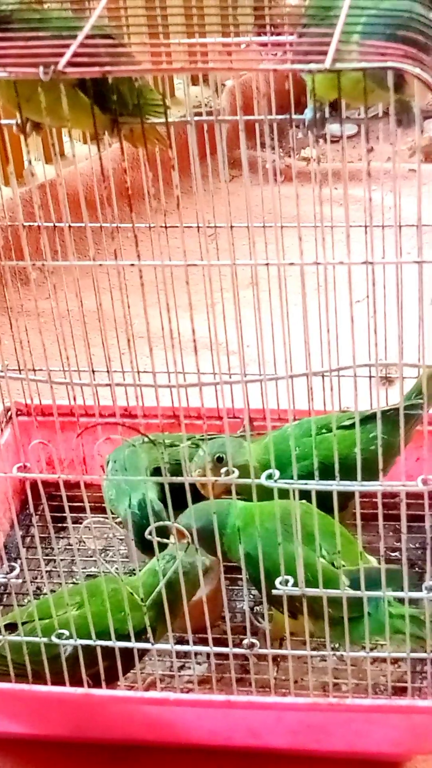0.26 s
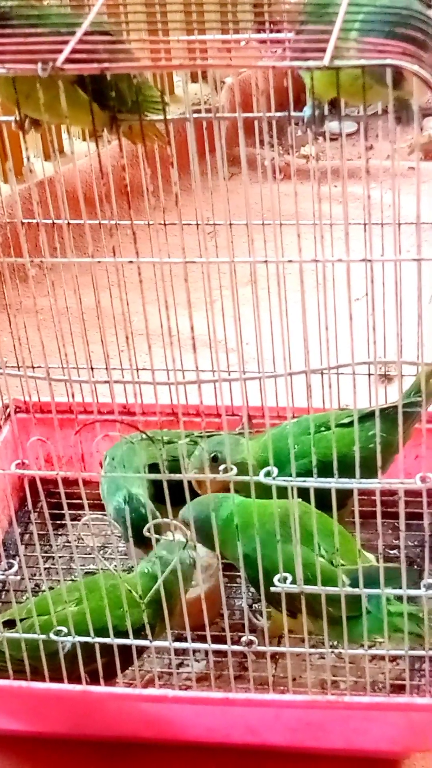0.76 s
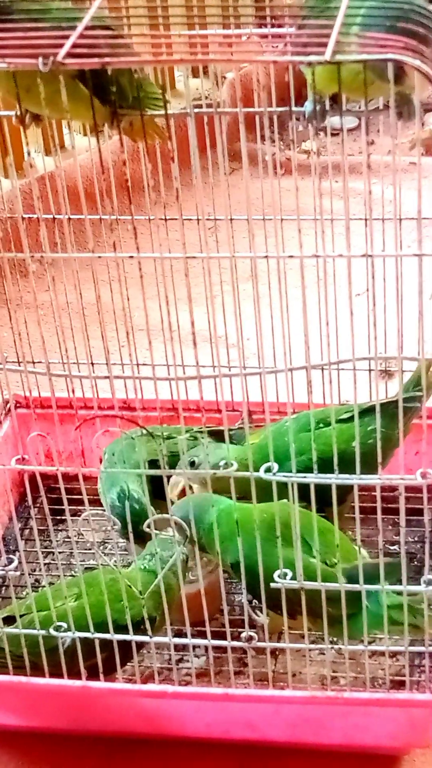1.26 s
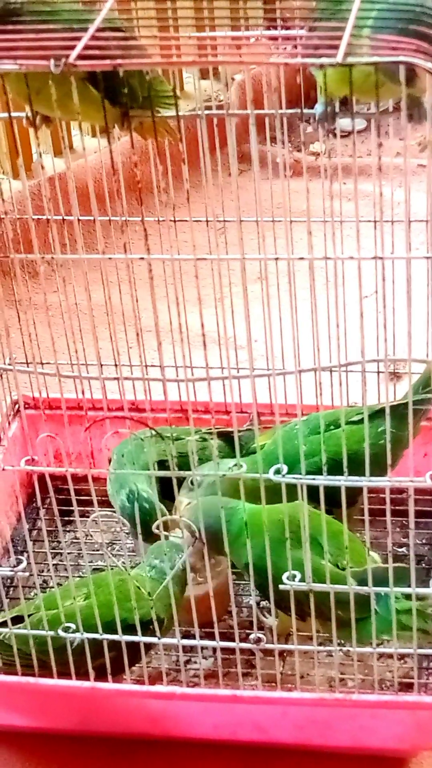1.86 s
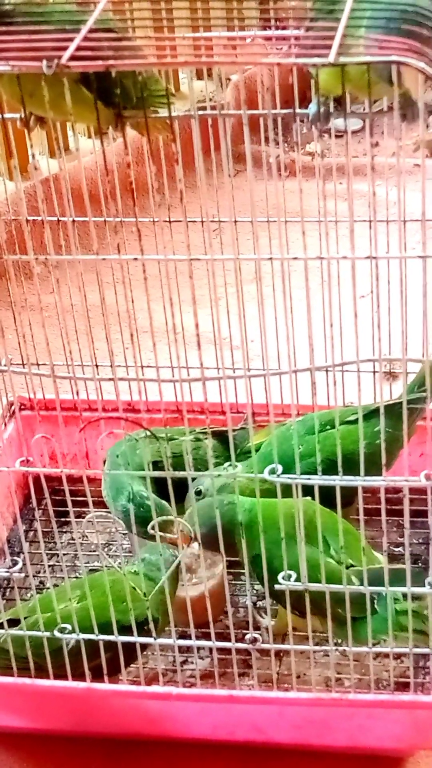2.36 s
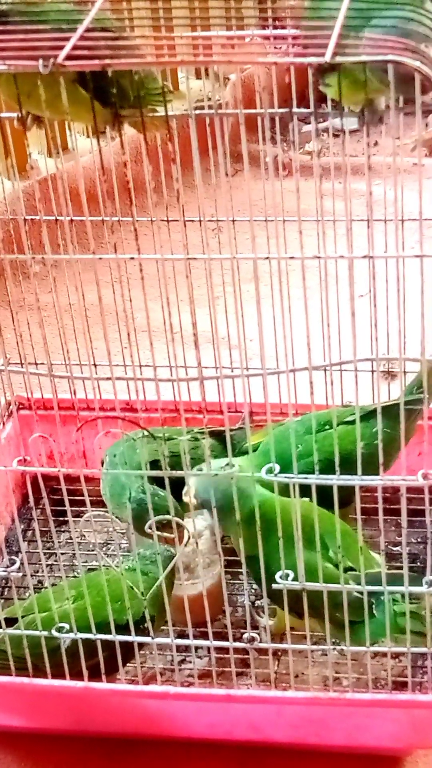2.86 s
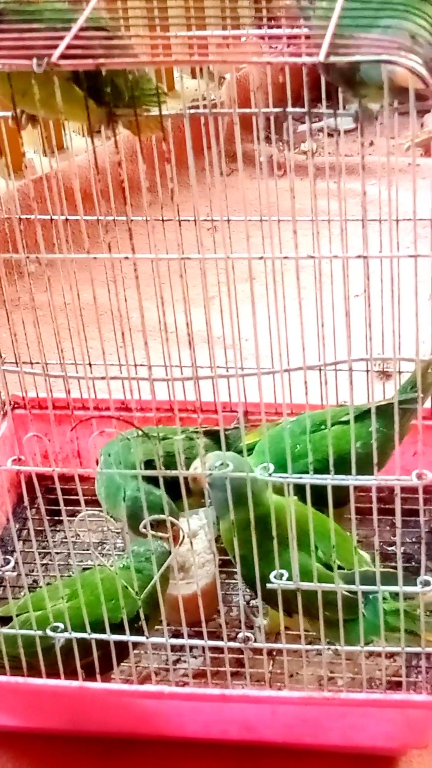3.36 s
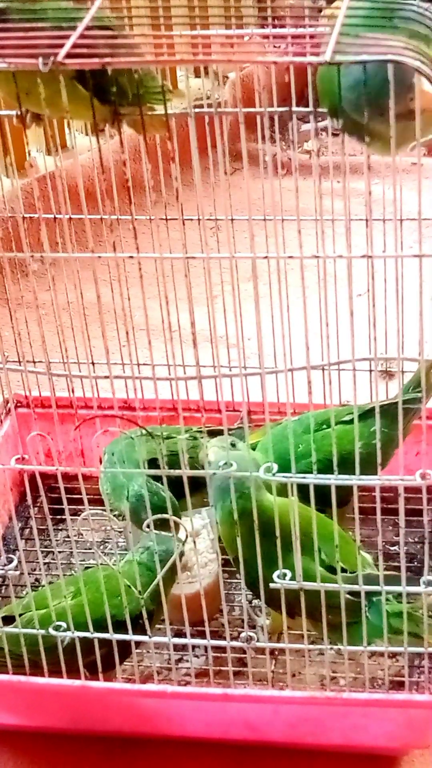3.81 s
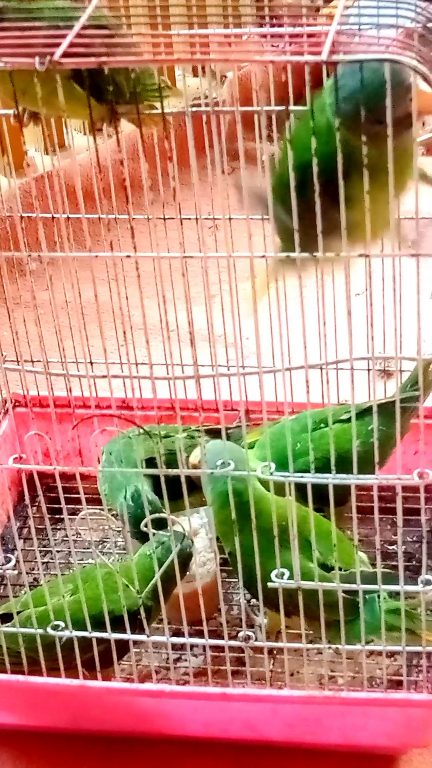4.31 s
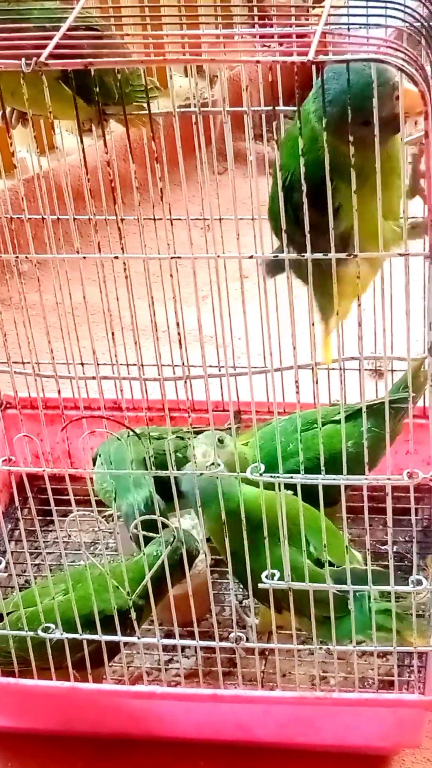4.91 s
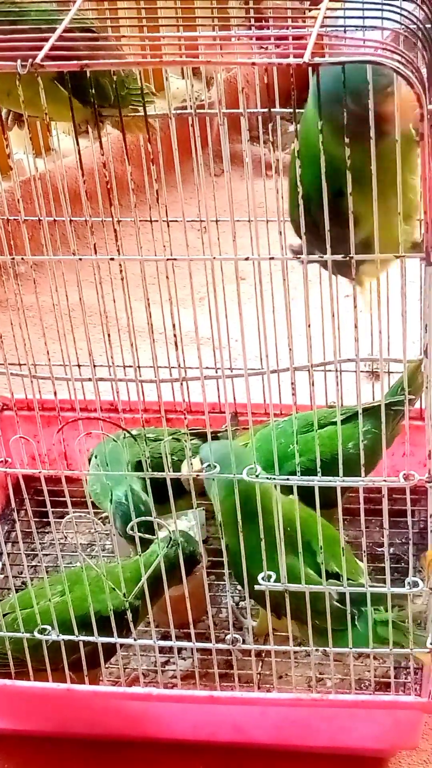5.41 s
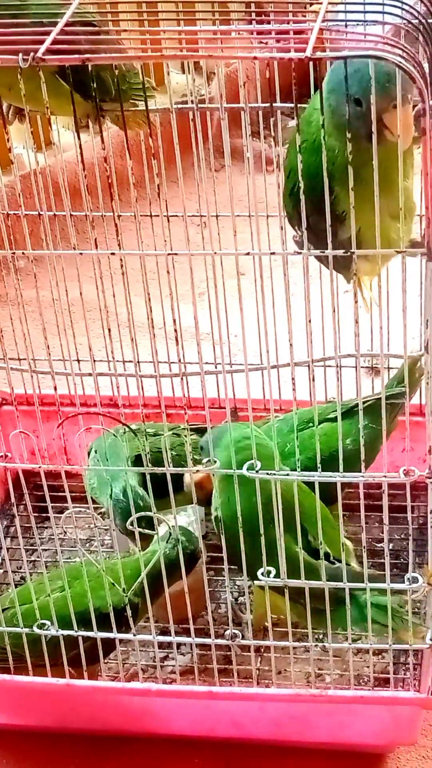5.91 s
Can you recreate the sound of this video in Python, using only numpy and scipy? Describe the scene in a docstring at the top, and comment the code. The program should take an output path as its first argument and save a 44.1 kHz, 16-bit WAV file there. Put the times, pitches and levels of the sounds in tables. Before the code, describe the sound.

Soft low coos and thin falling twitters sit in a lightly reverberant bird room, with an engine slowly gaining speed outside over muffled traffic. A distant horn toots briefly early on. At about three seconds a nearby parakeet lets out a raspy, rapidly warbling scream, then two more about a second apart. Its claws tick on thin wire. The screeches are direct and far louder than everything else.

```python
"""Parakeet in a wire cage

A parakeet close by screeches three times: a shrill syrinx tone in a fast, deep warble that starts as a rasp,
climbs and drops, shaped by throat and beak. Its claws scratch the cage wires and set their modes ringing.
Gliding near-pure tones make the soft dove-like coos and the small birds twittering farther off in the room.
Outside, a stack of engine orders hums and slowly gains speed beside a deeper hum, over a noise wash of faint
traffic with a rising whine of narrow noise; a far horn, a stack of harmonics, toots briefly."""
import sys
import numpy as np
from scipy import signal
from scipy.fft import rfft, irfft
from scipy.io import wavfile

SR = 44100
rng = np.random.default_rng(int(sys.argv[2]) if len(sys.argv) > 2 else 0)


def inscribe(sig):
    """Save sig as 16-bit PCM at rate SR to the path in sys.argv[1].

    A 1-D sig is mono; a 2-D sig holds one channel per row.
    Samples are clipped to [-1, 1] before scaling.
    """
    pcm = np.round(np.clip(np.atleast_2d(sig).T, -1, 1) * 32767)
    wavfile.write(sys.argv[1], SR, pcm.astype(np.int16))


N = 272538
TIME = np.arange(N) / SR


def from_db(db):
    """Decibels to gain."""
    return 10 ** (np.asarray(db) / 20)


def rms_one(x):
    """Scale to unit rms."""
    return x / np.sqrt(np.mean(x ** 2) + 1e-20)


def curves(rows, t=TIME):
    """Join each column of a table by straight lines in time."""
    s, *columns = np.transpose(rows)
    return [np.interp(t, s, c) for c in columns]


def at_hz(points, hz):
    """Read a spectrum on a log-frequency axis."""
    f, value = np.transpose(points)
    return np.interp(np.log(np.maximum(hz, 1)), np.log(f), value)


def band(x, low_hz, high_hz):
    """Butterworth band-pass."""
    edges_hz = [low_hz, min(high_hz, .45 * SR)]
    return signal.sosfilt(signal.butter(2, edges_hz, "band", fs=SR, output="sos"), x)


def drift(rate_hz, size=N, count=8):
    """Smooth random wander of spread 1, drawn at every count-th sample."""
    r = np.exp(-2 * np.pi * rate_hz * count / SR)
    noise = rng.standard_normal((size + SR) // count)
    slow = signal.lfilter([1], [1, -2 * r, r * r], noise)
    slow = slow[-(size // count + 2):]  # drop the filter's run-in
    return np.interp(np.arange(size) / count, np.arange(len(slow)), rms_one(slow))


def colour(x, points, size=2048):
    """Causal (minimum-phase) filter with the given spectrum."""
    gain = from_db(at_hz(points, np.arange(size // 2 + 1) * SR / size))
    cepstrum = irfft(np.log(gain))
    # folding the cepstrum forward gives minimum phase
    cepstrum[1:size // 2] *= 2
    cepstrum[size // 2 + 1:] = 0
    return signal.fftconvolve(x, irfft(np.exp(rfft(cepstrum))))[:N]


def phase_of(hz):
    """Running phase of a moving pitch."""
    return 2 * np.pi * np.cumsum(hz) / SR


def partials(phase, orders, flutter_db, flutter_hz):
    """Stack of sines on one phase, each fading in and out on its own; rms 1."""
    total = 0
    for order, db in orders:
        level = from_db(db + flutter_db * drift(flutter_hz))
        total = total + level * np.sin(round(order) * phase + rng.uniform(0, 2 * np.pi))
    return rms_one(total)


def held(start_s, length_s, fade_db_per_s):
    """Gain that fades in, holds for a while and fades out."""
    outside_s = np.maximum(np.abs(TIME - start_s - length_s / 2) - length_s / 2, 0)
    return from_db(-fade_db_per_s * outside_s)


def settle(t, first, last, time_s):
    """Exponential approach from one value to another."""
    return last + (first - last) * np.exp(-t / time_s)


def add(out, start_s, sound):
    """Mix a sound in at a given time."""
    i = max(round(start_s * SR), 0)
    out[i:i + len(sound)] += sound[:N - i]


# tone of the distant traffic: (frequency [Hz], relative level [dB])
TRAFFIC_SPECTRUM = [(25, -16), (70, 0), (130, -2.5), (250, -8), (380, -2.5), (520, -5.5), (630, -3.5),
                    (850, -4), (1350, -4), (1900, -11), (2400, -19), (4400, -20), (5500, -30.5),
                    (14000, -52.5)]
# level of the traffic noise, which dips briefly, before its gain: (time [s], level [dB])
TRAFFIC_LEVEL = [(0.0, -75), (1.2, -69), (1.74, -72), (2.25, -77.5), (2.56, -78.5), (2.79, -74.5),
                 (3.34, -76), (3.6, -73), (4.35, -69), (4.72, -69.5), (5.08, -70), (5.42, -71.5),
                 (5.63, -77.5), (5.82, -74.5), (6.02, -67), (6.18, -69)]


def traffic(gain_db=4.5, patchy_db=3.0, low_patchy_db=3.5):
    """A dull wash of noise, each band wandering on its own; its overall level dips briefly."""
    wash, edges_hz = 0, np.geomspace(25, 16000, 19)
    for low_hz, high_hz in zip(edges_hz, edges_hz[1:]):
        wander_db = low_patchy_db if high_hz < 1000 else patchy_db
        wash = wash + band(rng.standard_normal(N), low_hz, high_hz) * from_db(wander_db * drift(10.7))
    wash = colour(wash, TRAFFIC_SPECTRUM)
    level = from_db(curves(TRAFFIC_LEVEL)[0] + gain_db)
    return level * wash / np.std(band(wash, 700, 2200))  # the level refers to this midrange


WHINE_START_HZ, WHINE_RISE_HZ_PER_S, WHINE_TOP_HZ = 1586, 100, 2180
WHINE_START_DB, WHINE_RISE_DB_PER_S = -91.5, 3.5


def whine(width_hz=110):
    """Narrow noise around a slowly rising pitch: a breathy whine growing louder as it comes nearer."""
    phase = phase_of(np.minimum(WHINE_START_HZ + WHINE_RISE_HZ_PER_S * TIME, WHINE_TOP_HZ))
    breath = drift(width_hz) * np.cos(phase) + drift(width_hz) * np.sin(phase)
    return from_db(WHINE_START_DB + WHINE_RISE_DB_PER_S * TIME) * breath


# the engine gains speed steadily up to its working rate (firings per s)
FIRING_START_HZ, FIRING_RISE_HZ_PER_S, FIRING_TOP_HZ = 38.73, 1.2, 44.8
# engine's lowest tone, before its gain: (time [s], level [dB])
BOOM_LEVEL = [(0.0, -81.5), (2.19, -70), (2.44, -85), (2.82, -62), (3.08, -70), (3.84, -67.5),
              (3.94, -60.5), (4.42, -74), (4.58, -59), (4.68, -66.5), (5.58, -52), (6.18, -58)]
# engine's middle and upper tones, before their gains: (time [s], drone level [dB], rattle level [dB])
ENGINE_LEVELS = [(0.0, -72, -82.5), (0.27, -72.5, -68.5), (0.7, -66, -63.5), (1.46, -64.5, -55.5),
                 (1.53, -69.5, -58.5), (1.99, -60, -73), (2.05, -74, -80), (2.15, -59.5, -77),
                 (2.32, -75.5, -76), (3.05, -53, -73), (3.54, -64, -66), (3.89, -60, -69.5),
                 (4.11, -77, -78.5), (5.39, -63.5, -58.5), (5.56, -67, -71.5), (6.18, -67, -56.5)]
# engine orders of the drone: (multiple of the firing rate [1], relative level [dB])
DRONE_ORDERS = [(3, -5), (4, 1), (5, -2)]
# engine orders of the rattle: (multiple of the firing rate [1], relative level [dB])
RATTLE_ORDERS = [(6, 2.5), (7, -1.5), (8, -1.5), (9, -1), (10, -9)]


def engine(unsteady=0.0032, boom_gain_db=-.5, drone_gain_db=-1.0, rattle_gain_db=-4.0):
    """Orders of the firing rate: a clean boom, a drone and a fluttering rattle."""
    drone_db, rattle_db = curves(ENGINE_LEVELS)
    firing_hz = np.minimum(FIRING_START_HZ + FIRING_RISE_HZ_PER_S * TIME, FIRING_TOP_HZ)
    phase = phase_of(firing_hz * (1 + unsteady * drift(29)))
    boom = from_db(curves(BOOM_LEVEL)[0] + boom_gain_db) * rms_one(np.sin(2 * phase))
    drone = partials(phase, DRONE_ORDERS, flutter_db=3.0, flutter_hz=8.8)
    rattle = partials(phase, RATTLE_ORDERS, flutter_db=6, flutter_hz=15)
    return boom + from_db(drone_db + drone_gain_db) * drone + from_db(rattle_db + rattle_gain_db) * rattle


def whistles(notes, overtone_db, quaver, quaver_hz):
    """Nearly pure notes that glide through three pitches, swelling and fading."""
    out = np.zeros(N)
    for start_s, length_s, first_hz, middle_hz, last_hz, db in notes:
        u = np.linspace(0, 1, int(length_s * SR))  # progress through the note
        glide_hz = np.polyval(np.polyfit([0, .5, 1], [first_hz, middle_hz, last_hz], 2), u)
        phase = phase_of(glide_hz * (1 + quaver * drift(quaver_hz, len(u))))
        swell = np.sqrt(2 * np.abs(np.sin(np.pi * u)))
        add(out, start_s, from_db(db) * swell * (np.sin(phase) + from_db(overtone_db) * np.sin(2 * phase)))
    return out


COO_RISE, COO_FALL = 0.06, 0.055  # shares of the top pitch
# soft coos, levels before the swell and room: (time [s], length [s], top pitch [Hz], level [dB])
COO_NOTES = [(.08, 0.066, 469.7, -54.5), (.13, 0.16, 617, -63), (.34, 0.068, 607, -55.5),
             (.41, 0.332, 493, -55.5), (1.12, 0.031, 492, -55), (1.15, 0.14, 570.3, -57),
             (1.35, 0.31, 484.4, -63.5), (2.56, 0.11, 573, -67), (4.36, 0.065, 558, -62),
             (4.61, 0.082, 580, -62.5), (4.89, 0.043, 574, -60.5), (5.17, 0.074, 546.5, -60.5)]


def cooing():
    """Each coo is a shallow arch of pitch: it lifts to its top and sinks again."""
    return [(s, length, hz * (1 - COO_RISE), hz, hz * (1 - COO_FALL), db) for s, length, hz, db in COO_NOTES]


# far twitters, levels before the swell and room:
# (time [s], length [s], start pitch [Hz], share of the pitch lost [0-1], level [dB])
TWITTER_NOTES = [(.1, 0.076, 3567, .06, -74), (0.242, 0.14, 4180, 0.13, -75.5),
                 (0.314, 0.25, 5370, .04, -78.5), (.36, 0.15, 4740, .17, -68),
                 (0.363, .07, 3200, .14, -68.5), (0.469, .16, 5450, 0, -81), (0.655, .12, 3900, .18, -80.5),
                 (.86, .14, 4720, 0.12, -68.5), (.89, 0.066, 3910, 0.41, -67),
                 (1.34, .14, 4795, 0.02, -73.5), (1.85, 0.16, 4750, 0.2, -68.5),
                 (1.96, 0.093, 3860, 0.43, -69), (2.22, 0.06, 5090, 0.06, -74),
                 (2.27, 0.1, 4740, 0.05, -69.5), (2.417, .11, 4260, .1, -73.5),
                 (2.73, .09, 4540, 0.11, -71.5), (3.62, 0.22, 4900, 0.25, -77),
                 (4.03, 0.089, 4900, 0.14, -75.5), (4.2, 0.084, 4700, .19, -74.5),
                 (5.1, 0.11, 4415, 0.12, -71.5), (5.38, 0.087, 3850, 0.06, -76)]


def twitters():
    """Each twitter slides evenly in musical pitch, nearly all of them downwards."""
    notes = []
    for s, length, hz, fall, db in TWITTER_NOTES:
        notes.append((s, length, hz, hz * np.sqrt(abs(1 - fall)), hz * (1 - fall), db))
    return notes


def flock(mean_db=-83, count=28):
    """Fainter birds farther off: random chirps that swoop down to about a third and most of the way back."""
    notes = []
    for when, length, height, strength in rng.random((count, 4)):
        hz = 3400 + 2000 * height
        length_s, db = 0.043 + 0.037 * length, mean_db + 6 * (strength - .5)
        notes.append((when * N / SR, length_s, hz, 0.36 * hz, .82 * hz, db))
    return notes


HUM_FADE_DB_PER_S = 70
# spells of a second, deeper hum: (time [s], length [s], pitch [Hz], level [dB])
HUM_SPELLS = [(.23, 1.4, 73, -71.5), (3.88, .45, 62.1, -72), (5, 1.18, 62.8, -75.5)]


def deep_hum(waver_db=-0.4):
    """A low sine that comes and goes beside the engine."""
    tones = 0
    for s, length, hz, db in HUM_SPELLS:
        tone = rms_one(np.sin(2 * np.pi * hz * TIME))
        tones = tones + from_db(db) * held(s, length, HUM_FADE_DB_PER_S) * tone
    return from_db(waver_db * drift(6.9)) * tones


HORN_HZ, HORN_FADE_DB_PER_S = 388, 353
# harmonics of the horn: (multiple of its pitch [1], relative level [dB])
HORN_HARMONICS = [(1, 3), (3, -4), (4, -9), (5, 0), (6, -3.5), (7, 0), (8, 2), (9, -1)]
# far horn blasts, before the room: (time [s], length [s], level [dB])
HORN_TOOTS = [(1.103, 0.15, -66), (1.343, 0.21, -66.5), (1.56, 0.18, -71)]


def horn():
    """A buzzing diaphragm: harmonics of a trembling pitch, wavering over the distance."""
    level = sum(from_db(db) * held(s, length, HORN_FADE_DB_PER_S) for s, length, db in HORN_TOOTS)
    phase = phase_of(HORN_HZ * (1 + 0.018 * drift(113)))
    return level * partials(phase, HORN_HARMONICS, flutter_db=1.5, flutter_hz=6.9)


# a screech opens as a low growl, climbs from its rasp to the top pitch, then drops as the bird lets go
SCREECH_S, ONSET_S, DROP_AT_S = 0.316, 0.022, 0.283  # all times before each screech's stretch
START_HZ, RASP_HZ, TOP_HZ, END_HZ = 618.4, 1600, 3128, 1325
CLIMB_AT_S, CLIMB_WIDTH_S, DROP_HZ_PER_S = 0.079, 0.021, 90000
# its warble sets in with the rasp, slows steadily and dies in the drop; depth before each screech's factor
WARBLES_PER_S, WARBLE_SLOWING_PER_S2 = 72.2, 42
WARBLE_DEPTH_HZ, WARBLE_STOP_S = 902, 0.007
# the pulsing, noisy rasp settles into a clearer tone: first value, held value and settling time;
# both act as shares, limited where they are used
THROB_START, THROB_HELD, THROB_SETTLE_S = 1.29, 0.42, 0.046
ROUGH_START, ROUGH_HELD, ROUGH_SETTLE_S = 0.82, 0.13, 0.032
DROP_ROUGHENING_PER_S = 7
# effort in a screech, with a push at each end: (time after its start [s], level before its gain [dB])
EFFORT_LEVEL = [(0, -37), (.026, -22), (.052, -21.5), (.1, -25.5), (.2, -27), (.265, -27), (.285, -23.5),
                (.303, -24), (.316, -42)]


def screech_controls(t):
    """Crest pitch, warble depth and rate, throb, roughness and level through one screech."""
    onset = np.minimum(t / ONSET_S, 1) ** 2
    dropping_s = np.maximum(t - DROP_AT_S, 0)
    climb_hz = RASP_HZ + (TOP_HZ - RASP_HZ) / (1 + np.exp((CLIMB_AT_S - t) / CLIMB_WIDTH_S))
    crest_hz = START_HZ + onset * (np.maximum(climb_hz - DROP_HZ_PER_S * dropping_s, END_HZ) - START_HZ)
    warbling = onset * np.exp(-dropping_s / WARBLE_STOP_S)
    rate_hz = WARBLES_PER_S - WARBLE_SLOWING_PER_S2 * t
    throb = warbling * settle(t, THROB_START, THROB_HELD, THROB_SETTLE_S)
    rough = settle(t, ROUGH_START, ROUGH_HELD, ROUGH_SETTLE_S) + DROP_ROUGHENING_PER_S * dropping_s
    return crest_hz, warbling * WARBLE_DEPTH_HZ, rate_hz, throb, rough, curves(EFFORT_LEVEL, t)[0]


def screech(stretch, fundamental_db, swing, arch=1.9, lean=.6, lead=1.2, jitter=.13, rasp=0.4,
            uneven=.24, shimmer_db=2.25, slope_db=-1.5, count=8):
    """The syrinx tone swings in arches and weakens in each dip, most in the rasp; also gives beak opening."""
    t = np.arange(int(SCREECH_S * stretch * SR)) / SR
    crest_hz, depth_hz, rate_hz, throb, rough, level_db = screech_controls(t / stretch)
    warble = phase_of(rate_hz / stretch) + lead
    closing = (1 - np.cos(warble - lean * (1 + np.cos(warble)) / 2)) / 2  # opens slowly, closes quickly
    dip_hz = swing * depth_hz * closing ** arch * (1 + uneven * drift(40, len(t)))
    pitch_hz = (crest_hz - dip_hz) * (1 + jitter * rough * drift(630, len(t)))
    phase = phase_of(pitch_hz)
    tone = 0
    for k in range(1, count + 1):
        level = from_db(slope_db * k + fundamental_db * (k == 1))
        tone = tone + level * (k * pitch_hz < SR / 2) * np.sin(k * phase)
    air = rng.standard_normal(len(t)) * (1 + np.cos(phase))  # air escapes once a cycle
    effort = from_db(level_db + shimmer_db * drift(140, len(t)))
    effort = effort * (1 - np.clip(throb, 0, 1) * closing)
    opening = np.interp(crest_hz, [2100, 2950], [0, 1])  # the beak opens as the pitch climbs
    return effort * (tone * np.sqrt(1 - np.clip(rough, 0, .95)) + rasp * rough * air), opening


# screeches: (time [s], stretch [factor], gain [dB], fundamental against overtones [dB], warble depth [factor])
SCREECH_CALLS = [(3.0225, .98, 0, -1, 1.07), (4.414, 1.006, 1.35, -2, 1.14),
                 (5.489, 1.016, -1.5, 3.5, 0.95)]
# throat with the beak half open: (frequency [Hz], gain [dB])
HALF_OPEN_THROAT = [(350, -33), (570, -5), (950, -22.5), (1450, 1.5), (1830, -11.5), (2300, 4), (3400, -4),
                    (3800, 8), (4250, -1), (4650, 3.5), (6300, -6.5), (7400, -15), (10000, -23.5),
                    (14000, -36)]
# throat with the beak wide open: (frequency [Hz], gain [dB])
WIDE_OPEN_THROAT = [(500, -17.5), (1000, -18), (1830, -15.5), (2500, -2), (3000, 0), (3450, -4.5),
                    (4650, 4.5), (6100, 0.5), (6800, -18), (7900, -26), (8900, -7), (10000, -31.5),
                    (11400, -18), (13000, -38)]
# near surfaces (floor, tray, wall): (delay [s], gain [factor])
NEAR_ECHOES = [(.0019, 0.096), (.0046, 0.1), (.0083, .2), (0.0126, 0.25)]


def parakeet():
    """Screeches blend between two beak resonances, with echoes from the surfaces close by."""
    half, wide = np.zeros((2, N))
    for start_s, stretch, gain_db, fundamental_db, swing in SCREECH_CALLS:
        sound, opening = screech(stretch, fundamental_db, swing)
        add(half, start_s, from_db(gain_db) * sound * (1 - opening))
        add(wide, start_s, from_db(gain_db) * sound * opening)
    voice = colour(half, HALF_OPEN_THROAT) + colour(wide, WIDE_OPEN_THROAT)
    return voice + sum(gain * np.interp(TIME - delay, TIME, voice) for delay, gain in NEAR_ECHOES)


# claws on the wires, before a common 13 dB cut: (time [s], level [dB])
CLAW_TICKS = [(3.78, -64.5), (4.09, -58.5), (4.182, -55), (4.27, -57), (4.978, -53), (5.001, -66.5),
              (5.40, -65)]
# modes of the cage wire: (frequency [Hz], mean relative level [dB], decay by 60 dB [s])
WIRE_MODES = [(3666, -7, 0.17), (4900, -1.5, 0.094), (6060, -8, 0.13), (6800, -2, 0.037),
              (7930, -16, 0.061), (9140, -7, 0.12), (10800, -17, 0.049), (12060, -19, 0.04)]


def claws(scratch_db=-1, scratch_t60=0.11):
    """Each touch scratches briefly and rings the wire's modes with new strengths."""
    out, t = np.zeros(N), TIME[:SR // 4]
    for start_s, db in CLAW_TICKS:
        ring = 0
        for hz, mode_db, t60 in WIRE_MODES:
            strength_db = mode_db + rng.normal(0, 3.5)
            ring = ring + from_db(strength_db - 60 * t / t60) * np.sin(2 * np.pi * hz * t)
        scratch = band(rng.standard_normal(len(t)), 3500, 12000) * from_db(scratch_db - 60 * t / scratch_t60)
        add(out, start_s, from_db(db - 13) * (from_db(-4.5) * ring + scratch))
    return out


# decay of the room's tail: (frequency [Hz], decay by 60 dB [s])
ROOM_DECAY = [(300, 1), (2000, 0.44), (4500, 0.62), (7000, 0.097), (13000, 0.43)]


def room(x, early_t60, late_db):
    """Dense early scatter and a longer noise tail that dies by band, as one unit-energy response."""
    t, edges_hz = TIME[:SR], np.geomspace(100, 16000, 9)
    early = rng.standard_normal(SR) * from_db(-60 * t / early_t60)
    late = 0
    for low_hz, high_hz in zip(edges_hz, edges_hz[1:]):
        t60 = at_hz(ROOM_DECAY, np.sqrt(low_hz * high_hz))
        late = late + band(rng.standard_normal(SR), low_hz, high_hz) * from_db(-60 * t / t60)
    response = (early + from_db(late_db) * late) * np.clip(t / 0.0068, 0, 1)  # builds up over 6.8 ms
    return signal.fftconvolve(x, response / np.sqrt(np.sum(response ** 2)))[:N]


def scene():
    """The near bird is mostly direct, the far ones mostly room; both channels hear the same."""
    outside = traffic() + whine() + engine() + deep_hum()
    coos = whistles(cooing(), overtone_db=-18, quaver=0.014, quaver_hz=39.5)
    far = whistles(twitters() + flock(), overtone_db=-20, quaver=.027, quaver_hz=113) + horn()
    near = parakeet() + claws()
    inside = coos + from_db(-6) * room(coos, early_t60=0.034, late_db=-4.0)
    inside += from_db(-9.5) * far + from_db(-2.5) * room(far, early_t60=0.094, late_db=3.0)
    inside += near + from_db(-10.5) * room(near, early_t60=0.16, late_db=-17)
    return np.tile(outside + inside, (2, 1))


def record(dry):
    """A steep low-pass cuts the top."""
    return signal.sosfilt(signal.ellip(12, .1, 80, 14300, fs=SR, output="sos"), dry)


dry = scene()
out = record(dry)
inscribe(out)
```